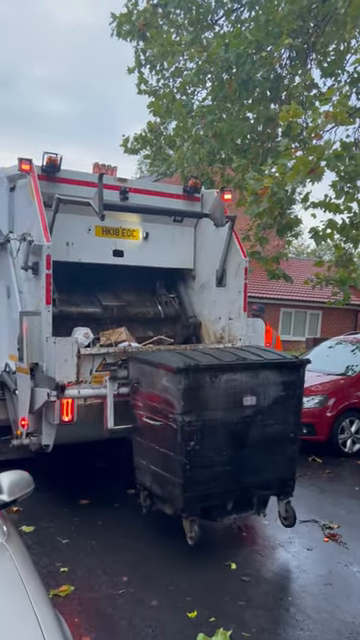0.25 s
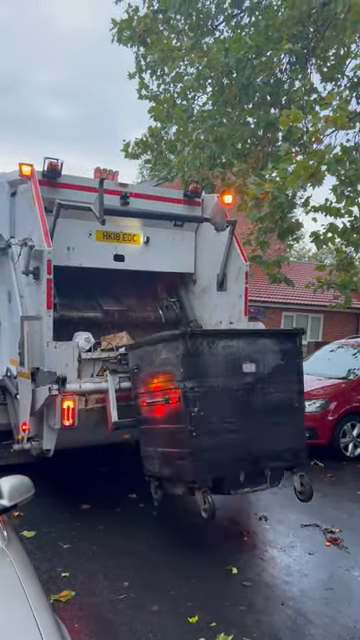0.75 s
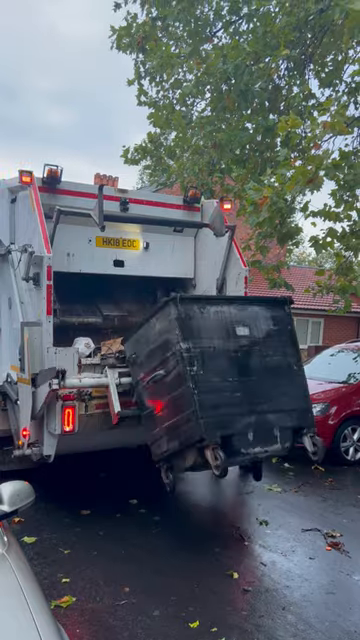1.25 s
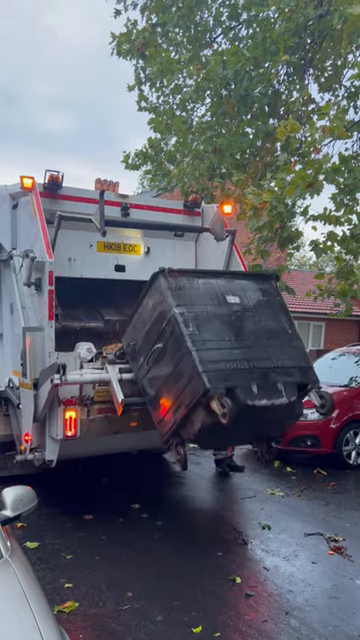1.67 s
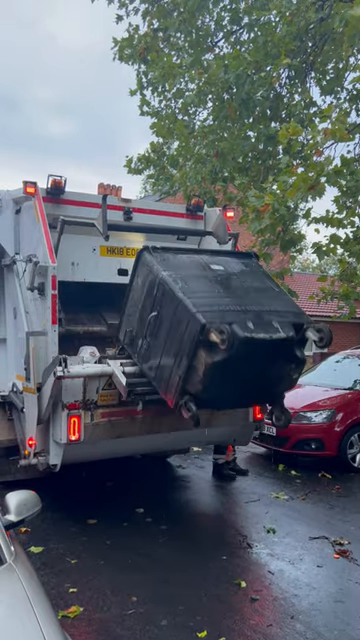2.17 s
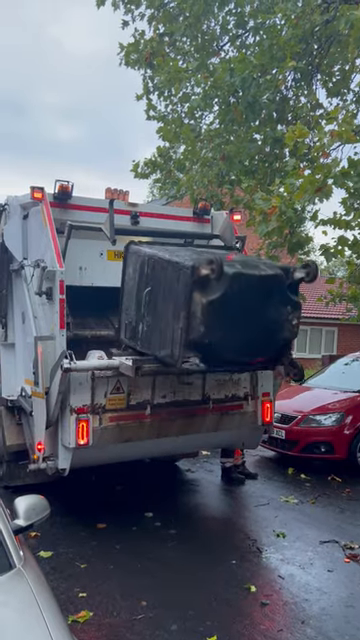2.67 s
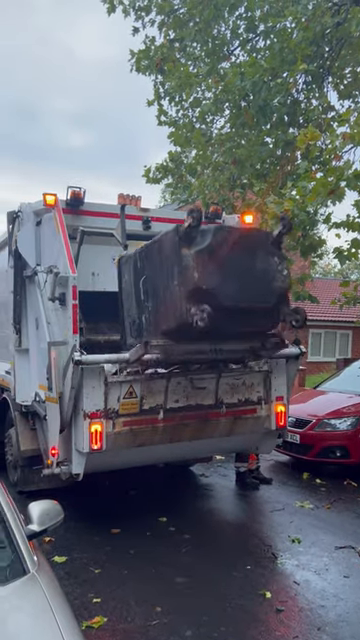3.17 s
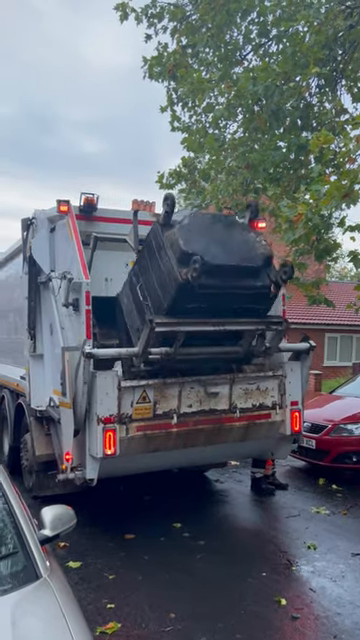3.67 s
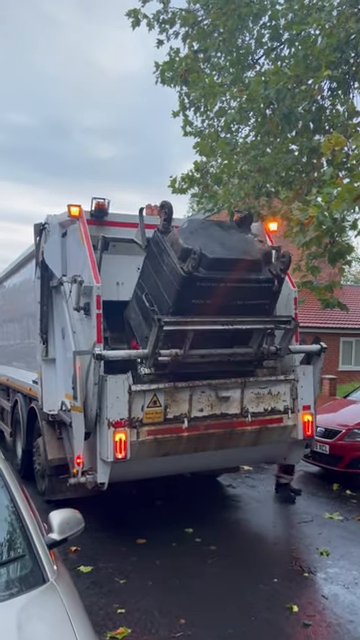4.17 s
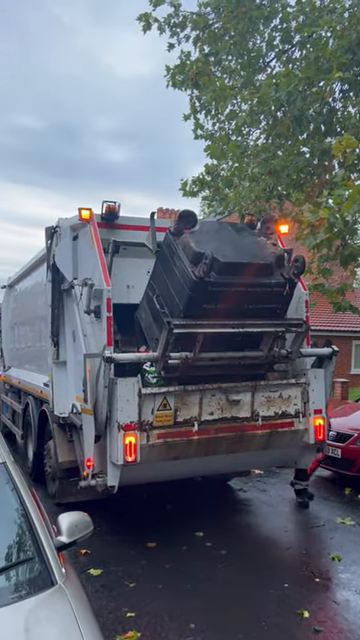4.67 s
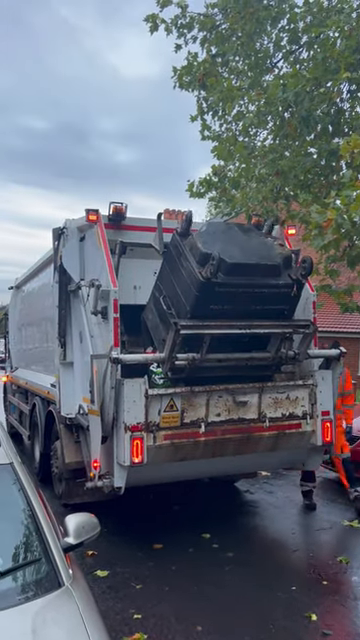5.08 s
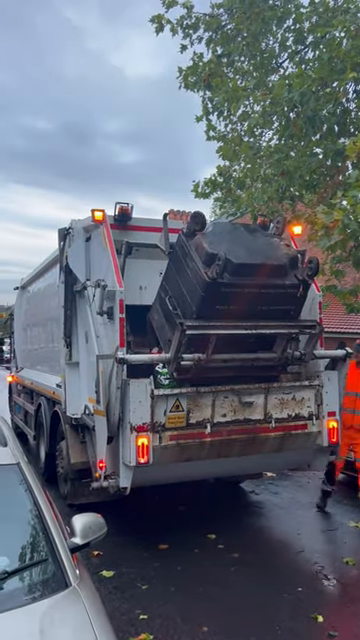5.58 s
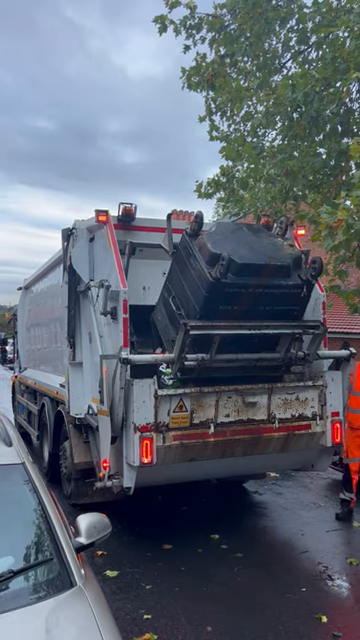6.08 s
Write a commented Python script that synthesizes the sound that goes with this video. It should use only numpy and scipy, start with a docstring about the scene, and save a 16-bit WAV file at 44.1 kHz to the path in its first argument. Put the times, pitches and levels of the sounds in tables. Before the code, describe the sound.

A refuse truck's engine drones and its hydraulics whine as a big wheeled bin clatters upward, scrapes, drops its rubbish and slams hard.

```python
"""A refuse truck runs throughout: tones tied to its crank drone, firings boom, gear whirrs, oil hisses, pump and lift whine.
The bin is knocked (panel noise and ringing modes), its fittings clink, its hollow body thumps, air spits.
It scrapes over the lift frame at 1.2 s; rubbish slides out in grains from 3.2 s; the frame slams its stop at 4.2 s.
The oil valve whistles shut at 4.7 s and open at 5.95 s, when the steelwork shudders.
House fronts answer all but the tones; two microphone ports hear it from slightly left."""
import sys
import numpy as np
from scipy import signal
from scipy.fft import rfft, irfft, next_fast_len
from scipy.io import wavfile
from scipy.ndimage import map_coordinates

SR = 44100
rng = np.random.default_rng(int(sys.argv[2]) if len(sys.argv) > 2 else 0)


def int16_out(signal):
    """Quantize to a 16-bit WAV file."""
    q = np.round(np.clip(np.atleast_2d(signal).T, -1, 1) * 32767)
    wavfile.write(sys.argv[1], SR, q.astype(np.int16))


N = 279149


def amp(db):
    """Decibels to gain."""
    return 10 ** (np.asarray(db) / 20)


def unit(x):
    """Scale to rms 1."""
    return x / np.sqrt(np.mean(x ** 2) + 1e-20)


def along(points, hz):
    """Read (freq_hz, value) points on a log frequency axis."""
    f, v = np.transpose(points)
    return np.interp(np.log(hz + 1), np.log(f + 1), v)


def curves(rows):
    """One value per sample for each column after time_s."""
    s, *cols = np.transpose(rows)
    return [np.interp(np.arange(N) / SR, s, c) for c in cols]


def wobble(rate_hz):
    """Smooth random curve, rate_hz knots a second."""
    coarse = np.arange(0, N + 64, 64)
    knots = rng.standard_normal(int(N * rate_hz / SR) + 4)
    smooth = map_coordinates(knots, [coarse * rate_hz / SR])
    return np.interp(np.arange(N), coarse, smooth)


def filtered(x, response):
    """Multiply the spectrum of x by response(hz)."""
    size = x.shape[-1]
    m = next_fast_len(size + 8192)
    return irfft(rfft(x, m) * response(np.fft.rfftfreq(m, 1 / SR)), m)[..., :size]


def coloured(x, spectrum):
    """Shape x with a spectrum, at rms 1."""
    return unit(filtered(x, lambda hz: amp(along(spectrum, hz))))


def noise(spectrum, size=N):
    """Gaussian noise of rms 1 with a spectrum."""
    return coloured(rng.standard_normal(size), spectrum)


def grains(rate_hz, spread_db):
    """Random tiny impacts of uneven size, at rms 1."""
    hits = rng.random(N) < rate_hz / SR
    sizes = rng.standard_normal(N) * amp(spread_db * rng.standard_normal(N))
    return unit(hits * sizes)


def fade(t60_s, attack_s):
    """Half a second of quick rise and exponential decay."""
    t = np.arange(SR // 2) / SR
    return (1 - np.exp(-t / attack_s)) * np.exp(-np.log(1000) * t / max(t60_s, .01))


def swell(start_s, end_s, attack_s, release_s):
    """Gain that rises from start_s, holds, and dies away after end_s."""
    t = np.arange(N) / SR
    rise = 1 - np.exp(-np.maximum(t - start_s, 0) / attack_s)
    return rise * np.exp(-np.maximum(t - end_s, 0) / release_s)


def add(track, s, sound):
    """Mix a sound in at time s."""
    part = track[int(s * SR):][:len(sound)]
    part += sound[:len(part)]


# hydraulic pump speed: time_s, pitch_hz
PUMP_SPEED = [(0, 427.8), (.65, 402.8), (1.2, 393.5), (2.5, 390.9), (3.6, 393.7), (4.5, 402.5),
              (4.85, 396.1), (6.12, 400.1), (6.33, 416)]


def shaft():
    """Crank turns; the pump tone is the sixteenth order of the crank."""
    pitch_hz = curves(PUMP_SPEED)[0] * (1 + .0025 * wobble(14))
    return np.cumsum(pitch_hz) / SR / 16


# truck effort, highest while it swings the full bin up: time_s, over_idle_db
EFFORT_CURVE = [(0, 12.5), (.8, 9.5), (.9, 14), (1.72, 12), (1.87, 6), (2.45, 0), (2.8, 2.5), (3.6, -3),
                (3.9, 6), (4.5, 2), (5.7, 0.5), (6.33, 9)]


def effort():
    """How hard the truck works, in dB over idle."""
    return curves(EFFORT_CURVE)[0]


def crank_tone(turns, multiple, flutter_db, blur_rad=0):
    """Sine locked to a multiple of crank speed, at rms 1, with fluttering level and blurred phase."""
    phase = 2 * np.pi * (multiple * turns + rng.random()) + blur_rad * wobble(40)
    return unit(np.sin(phase) * amp(flutter_db * wobble(7)))


ENGINE_IDLE_DB = -32.5
# engine orders and body resonances, as crank multiples: crank_multiple, relative_db
DRONE_TONES = [(2.1,-8),(3,-12.5),(4,-12.5),(5.5,-8.5),(6.2,-15.5),(8,-13.2),(9,-16),(11.5,-19.5)]


def drone(turns):
    """Engine orders and body resonances drone, following the effort."""
    mix = sum(amp(db) * crank_tone(turns, k, flutter_db=3.8) for k, db in DRONE_TONES)
    return amp(ENGINE_IDLE_DB + effort()) * mix


# hollow body's response to firings: freq_hz, relative_db
BOOM_SPECTRUM = [(22,-36),(36,-6.5),(54,-1.5),(90,-5.5),(115,-3),(140,-3),(180,-7.5),(230,-5.5),(330,-13.5),(500,-16.5),(800,-60)]


def boom(turns):
    """Three firings per crank turn and small random knocks shake the hollow body."""
    firings = np.diff(np.floor(turns * 3), prepend=0)
    shake = unit(firings * (1 + 0.12 * rng.standard_normal(N)))
    knocking = 0.19 * shake + grains(rate_hz=1500, spread_db=0.5)
    return amp(ENGINE_IDLE_DB + effort() - 2.5) * coloured(knocking, BOOM_SPECTRUM)


WHINE_ATTACK_S, WHINE_RELEASE_S = 0.073, 0.14
# pump strokes: start_s, end_s, level_db
PUMP_STROKES = [(-.2, 0.647, -36.5), (1.05, 2.675, -41.5), (2.84, 3.7, -48.5), (4.152, 4.86, -40.5),
                (6.214, 6.405, -31.5)]


def pump(turns):
    """The pump whines in strokes."""
    tone = crank_tone(turns, 16, flutter_db=2, blur_rad=.3)
    pumping = sum(amp(db) * swell(start, end, WHINE_ATTACK_S, WHINE_RELEASE_S)
                  for start, end, db in PUMP_STROKES)
    return pumping * tone


LIFT_START_DB, LIFT_FADE_DB_PER_S, LIFT_END_S = -46.5, 0.5, 4.63
# lift cylinder tones: crank_multiple, relative_db
LIFT_TONES = [(26.55,-0.5),(32,-2),(34.7,-7),(44,-4.5),(48.5,-7),(64,-11)]


def lift(turns):
    """The lift cylinders sing in several tones, fading slowly, then dying away after LIFT_END_S."""
    mix = sum(amp(db) * crank_tone(turns, k, flutter_db=2.5, blur_rad=.6) for k, db in LIFT_TONES)
    level_db = LIFT_START_DB - LIFT_FADE_DB_PER_S * np.arange(N) / SR
    return amp(level_db) * swell(0, LIFT_END_S, WHINE_ATTACK_S, release_s=0.46) * mix


RATTLE_IDLE_DB, RATTLE_DB_PER_EFFORT_DB, SCRAPE_RATTLE_DB = -37, 0.3, 3
OIL_IDLE_DB, OIL_DB_PER_EFFORT_DB, SCRAPE_HISS_DB = -45, 0.096, 4.5
VALVE_SHUT_S, VALVE_OPEN_S, BLEED_DB_PER_S = 4.7, 5.95, 5
# running gear: freq_hz, relative_db
RATTLE_SPECTRUM = [(180,-38),(300,-10),(520,-2.5),(780,-1),(1000,-6.5),(1250,-6),(1700,-12.5),(2200,-10),(3200,-19),(5000,-47)]
# oil hiss: freq_hz, relative_db
HISS_SPECTRUM = [(1800, -39), (3000, 1), (4200, 2), (6000, -4.5), (8000, -8.5), (11000, -16), (14000, -17),
                 (16000, -15)]


def machinery():
    """Gear whirrs and oil hisses, swelling with the scrape; rows: direct, scatter left, scatter right."""
    t = np.arange(N) / SR
    rattle = noise(RATTLE_SPECTRUM, (3, N))
    oil = noise(HISS_SPECTRUM, (3, N))
    scrape = scraping()
    # hiss bleeds away while the valve is shut
    reopened = swell(VALVE_OPEN_S, t[-1], attack_s=0.014, release_s=1)
    bleed_db = BLEED_DB_PER_S * np.maximum(t - VALVE_SHUT_S, 0) * (1 - reopened)
    rattle_db = RATTLE_IDLE_DB + RATTLE_DB_PER_EFFORT_DB * effort() + SCRAPE_RATTLE_DB * scrape
    rattle_db = rattle_db - 0.25 * bleed_db + 1.1 * wobble(18)
    oil_db = OIL_IDLE_DB + OIL_DB_PER_EFFORT_DB * effort() + SCRAPE_HISS_DB * scrape
    oil_db = oil_db - bleed_db + 0.67 * wobble(15)
    return amp(rattle_db) * rattle + amp(oil_db) * oil


# blows on the bin, levels before trims:
# start_s, level_db, brightness_db_per_octave, ring_t60_s, mode_hz, mode_vs_blow_db
BIN_BLOWS = [(.2, -17, -5.5, 0.12, 800, -8), (.395, -18, -3.5, 0.15, 1710, -16),
             (.568, -16.5, -3.5, 0.44, 752, -14), (.679, -21, -3, .06, 986, 0),
             (.871, -13, -3, 0.18, 639, -6), (1.277, -21, 0, .1, 835, -4), (1.357, -14.5, 0, 0.25, 880, -6),
             (1.437, -13, -1.5, 0.18, 1696, -12), (1.455, -13.5, -4, 0.1, 591, -4),
             (1.483, -16.5, -3.5, 0.094, 767, 0), (1.528, -15.5, -2, .15, 1197, -12),
             (1.954, -19, 0.5, 0.47, 702.7, -10.5), (3.134, -29, -11, 0.25, 319, -9),
             (3.662, -20.5, 1, 0.4, 464, -7.5), (3.79, -18, -3.5, 0.27, 1510, -13),
             (3.823, -12, -5, 0.22, 1407, -17), (3.854, -15.5, -6, 0.2, 393, -5),
             (3.914, -14.5, -2, 0.28, 747.5, -7), (4.016, -15, -5, 0.21, 324, -12),
             (4.18, -9.5, -1.5, 0.3, 333, -9.5), (4.222, -13.5, -3.5, 0.27, 381, -9),
             (4.312, -20.5, -0.5, 0.14, 603, -8), (4.523, -19.5, -1.5, 0.1, 1202, -9),
             (5.948, -17.5, -2.5, 0.16, 898, -9)]
# bin resonances: centre_hz, width_hz, relative_db
BIN_MODES = [(344, 100, -5), (877, 100, -3), (1213, 57, -8.5)]
# dense panel modes: freq_hz, relative_db
PANEL_SPECTRUM = [(80, -68), (250, -8.5), (380, -2), (520, 2.5), (700, -1), (950, -9), (1400, -11.5),
                  (2600, -11.5), (4500, -18.5), (14000, -41)]


def bin_response(f):
    """Sum of the bin's band-pass resonances."""
    return sum(amp(db) * 1j * f * w / (c * c - f * f + 1j * f * w) for c, w, db in BIN_MODES)


def blows():
    """Each contact clatters through dense panel modes and leaves the bin ringing, one mode most of all."""
    out, size = np.zeros(N), SR // 2
    t = np.arange(size) / SR
    for s, db, bright_db, t60, mode_hz, mode_db in BIN_BLOWS:
        slope = lambda hz: amp(bright_db * np.log2(np.clip(hz, 200, 8000) / 800))
        decay = fade(0.59 * t60, attack_s=0.0012) + 0.84 * fade(0.053, attack_s=0.00075)
        clatter = noise(PANEL_SPECTRUM, size) * decay
        ring = unit(filtered(rng.standard_normal(size), bin_response))
        ring = ring * fade(1.28 * t60, attack_s=0.0046)
        # loose contact makes the phase of the favoured mode drift
        drift = 0.084 * np.cumsum(rng.standard_normal(size))
        note = np.sin(2 * np.pi * mode_hz * t + drift) * fade(t60, attack_s=0.00057)
        rough = filtered(amp(db - 10) * clatter + amp(db - 13.0) * ring, slope)
        add(out, s, rough + amp(db + mode_db) * note)
    return out


CLINK_T60_S, CLINK_LOG_SPREAD = 0.088, .15
# loudest castors and catches: time_s, level_db before trim, centre_pitch_hz
FITTING_CLINKS = [(0.5574, -24, 3880), (.864, -23.5, 3860), (.933, -26, 3700), (1.209, -25, 4480),
                  (1.292, -23.5, 3960), (1.3482, -22, 4270), (1.431, -24.5, 4360), (1.507, -27, 4180),
                  (1.5295, -27, 4270), (1.946, -25, 3850), (2.732, -28, 4700), (3.321, -31, 4480),
                  (3.5819, -26.5, 3870)]
# castor tick: freq_hz, relative_db
CASTOR_SPECTRUM = [(1500, 6.5), (2800, -1), (3700, 1), (4500, -1), (5600, -12), (8000, -9), (15000, -29)]


def fittings():
    """Loose castors and catches tick and ring briefly, each in its own cluster of 30 pitches."""
    out, size = np.zeros(N), SR // 8
    t = np.arange(size) / SR
    for s, db, hz in FITTING_CLINKS:
        pitches = hz * np.exp(CLINK_LOG_SPREAD * rng.standard_normal(size=(30, 1)))
        ring = unit(np.sin(2 * np.pi * (pitches * t + rng.random(pitches.shape))).sum(axis=0))
        ring = ring * fade(CLINK_T60_S, attack_s=0.0013)[:size]
        tick = noise(CASTOR_SPECTRUM, size) * fade(t60_s=0.094, attack_s=0.001)[:size]
        add(out, s - .002, amp(db - 7.5) * (tick + ring))
    return out


THUMP_LOW_HZ, THUMP_HIGH_HZ = 60.2, 134.3
# dull thumps: start_s, level_db before trim, upper_mode_share_0_1
BODY_THUMPS = [(.628, -7.5, 0.04), (1.441, -9, 0.1), (1.97, -14, 0.95), (2.03, -20, 0), (2.218, -17, 0.01),
               (3.8, -8.5, 0.12), (3.869, -8, 0.13), (4.43, -11.5, 0.05), (5.349, -15.5, 0.68),
               (5.435, -14, 0.93), (6.02, -12, 0.5)]


def thumps():
    """A shifting load sets two low modes of the hollow body swinging."""
    out, t = np.zeros(N), np.arange(SR // 2) / SR
    low, high = np.sin(2 * np.pi * np.outer([THUMP_LOW_HZ, THUMP_HIGH_HZ], t))
    for s, db, upper in BODY_THUMPS:
        swing = low + np.clip(upper, 0, 1) * (high - low)
        add(out, s, amp(db - 1) * swing * fade(t60_s=0.24, attack_s=0.014))
    return out


# sharp spits of air and cracks: start_s, level_db, t60_s
AIR_SPITS = [(1.064, -23, 0.65), (4.111, -24, 0.28), (4.202, -15, 0.032), (4.208, -27.5, 0.15)]
# escaping air: freq_hz, relative_db
AIR_SPECTRUM = [(1200, -4), (3000, 4.5), (4500, -2.5), (8000, -0.5), (13000, -2), (16000, -1.5)]


def spits():
    """Bright noise bursts that die away; the shorter, the sharper their start."""
    out = np.zeros(N)
    for s, db, t60 in AIR_SPITS:
        add(out, s, amp(db) * noise(AIR_SPECTRUM, SR // 2) * fade(t60, attack_s=0.01 * t60))
    return out


SCRAPE_START_S, SCRAPE_END_S, SCRAPE_ATTACK_S, SCRAPE_RELEASE_S = 1.194, 1.46, 0.075, 0.2
SCRAPE_JUDDER_DEPTH, SCRAPE_JUDDER_HZ = 0.23, 55.26


def scraping():
    """Pressure of the tilting bin on the lift frame, juddering as it sticks and slips."""
    press = swell(SCRAPE_START_S, SCRAPE_END_S, SCRAPE_ATTACK_S, SCRAPE_RELEASE_S)
    return press * (1 + SCRAPE_JUDDER_DEPTH * wobble(SCRAPE_JUDDER_HZ))


GRIT_DB = -40
# rust and grit: freq_hz, relative_db
GRIT_SPECTRUM = [(1000, -18), (1700, 4), (2600, -16), (3700, -4), (4700, 1.5), (6000, -23)]


def grit():
    """Grit crunches under the sliding bin as random grains."""
    return amp(GRIT_DB) * scraping() * coloured(grains(rate_hz=600, spread_db=3.5), GRIT_SPECTRUM)


FALL_ATTACK_S, FALL_RELEASE_S = 0.012, 0.15
# loads sliding out: start_s, end_s, tumbling_db, rustling_db
RUBBISH_FALLS = [(3.173, 3.255, -59, -43), (3.56, 3.764, -37.5, -42), (3.787, 3.96, -26, -40),
                 (4.052, 4.29, -31, -41)]
# tumbling sacks: freq_hz, relative_db
TUMBLE_SPECTRUM = [(70,-29),(175,5.5),(400,5),(800,1),(1000,-1.5),(1550,-7.5),(1900,-16),(3000,-28),(6000,-30.5)]
# rustling plastic: freq_hz, relative_db
RUSTLE_SPECTRUM = [(1200, -3), (3000, 7.5), (4500, -1.5), (8000, -2), (13000, -7.5), (16000, -6.5)]


def rubbish():
    """Sacks tumble in lumps down the bin wall into the hopper, their plastic rustling."""
    tumbling, rustling = sum(np.outer(amp(levels_db), swell(start, end, FALL_ATTACK_S, FALL_RELEASE_S))
                             for start, end, *levels_db in RUBBISH_FALLS)
    lumps = amp(3.0 * wobble(45))
    tumble = tumbling * lumps * coloured(grains(rate_hz=1100, spread_db=1.5), TUMBLE_SPECTRUM)
    rustle = rustling * coloured(grains(rate_hz=7000, spread_db=-1.0), RUSTLE_SPECTRUM)
    return tumble + rustle


CRACK_DB = 1.5  # against the slam
# frame slams into its stop, bounces once: start_s, level_db before trims
FRAME_SLAMS = [(4.179, -5.8), (4.198, -10.8)]
# steel meeting steel: freq_hz, relative_db
CRACK_SPECTRUM = [(150, -22), (400, 4), (850, 4), (1700, -1.5), (4000, -17), (9000, -31)]


def cracks():
    """The hard, short noise burst at each slam."""
    out = np.zeros(N)
    for s, db in FRAME_SLAMS:
        burst = noise(CRACK_SPECTRUM, SR // 2) * fade(t60_s=0.04, attack_s=0.0036)
        add(out, s, amp(db + CRACK_DB) * burst)
    return out


CRASH_DB, CRASH_T60_S, CLANG_DB = -22, 0.57, -15.5  # levels against the slam
# frame modes: freq_hz, relative_db, t60_s
FRAME_MODES = [(306, 0.5, 0.41), (367, 1.5, .38), (528, 1.5, 0.18), (659, -1, 0.2), (917, -1, 0.47),
               (1256, -13, 0.38), (1800, -12, .18), (2515, 1, 0.17)]
# loose plates: freq_hz, relative_db
CRASH_SPECTRUM = [(200, -25), (380, 5), (800, -6), (1300, -1), (1900, -11), (5000, -33)]


def frame():
    """Frame modes clang, roughened by the bin rattling on it, over the crash of loose plates."""
    out, t = np.zeros(N), np.arange(SR // 2) / SR
    for s, db in FRAME_SLAMS:
        crash = noise(CRASH_SPECTRUM, len(t)) * fade(CRASH_T60_S, attack_s=.01)
        add(out, s, amp(db + CRASH_DB) * crash)
        for hz, mode_db, t60 in FRAME_MODES:
            drift = .0026 * np.sqrt(hz) * np.cumsum(rng.standard_normal(len(t)))
            clang = np.sin(2 * np.pi * hz * t + drift) * fade(t60, attack_s=.001)
            add(out, s, amp(db + CLANG_DB + mode_db) * clang)
    return out


WHISTLE_HZ, WHISTLE_DB, WHISTLE_S = 4840, -43.5, .1


def whistle():
    """Oil squeezes through the valve as it shuts and opens: a thin, unsteady note."""
    drift = 0.132 * np.cumsum(rng.standard_normal(N))
    phase = 2 * np.pi * WHISTLE_HZ * np.arange(N) / SR + drift
    moving = sum(swell(s, s + WHISTLE_S, attack_s=0.0097, release_s=0.065)
                 for s in (VALVE_SHUT_S, VALVE_OPEN_S))
    return amp(WHISTLE_DB) * np.sin(phase) * moving


SHUDDER_DB, SHUDDER_END_S = -25.8, 5.995
# shuddering steelwork: freq_hz, relative_db
SHUDDER_SPECTRUM = [(250, -10), (600, -4.5), (900, -1), (1500, -10.5), (2400, -26), (5000, -45)]


def shudder():
    """The steelwork shudders in a short, rough rush as the oil pressure returns."""
    rush = coloured(grains(rate_hz=1800, spread_db=0), SHUDDER_SPECTRUM)
    return amp(SHUDDER_DB) * swell(VALVE_OPEN_S, SHUDDER_END_S, attack_s=0.012, release_s=0.067) * rush


# house fronts: freq_hz, t60_s
STREET_DECAY = [(100,0.21),(1000,0.24),(4000,0.029),(14000,0.025)]


def street(x):
    """Diffuse echo of the house fronts, unrelated at the two ports and slowly varying."""
    out, step = np.zeros((2, N)), SR // 4
    # tails redrawn every quarter second and crossfaded, to avoid fixed ripple
    for start in range(0, N + step, step):
        hz, t, z = signal.stft(rng.standard_normal((2, SR // 3)), SR, nperseg=256)
        t60 = along(STREET_DECAY, hz)[:, None]
        decay = np.exp(-np.log(1000) * t / t60) / np.sqrt(t60)
        tail = signal.istft(z * decay, SR, nperseg=256)[1]
        span = np.arange(max(start - step, 0), min(start + step, N))
        piece = x[span] * np.cos(np.pi / 2 * (span - start) / step)
        for side, answer in zip(out, tail):
            add(side, span[0] / SR, signal.fftconvolve(piece, answer / np.linalg.norm(answer)))
    return out


# left port's phase lead: freq_hz, lead_rad
PORT_LEAD = [(0,0),(1500,0),(2200,2.4),(3300,2.6),(3800,.6),(5300,3.14),(7500,6.28),(10200,9.42),(15100,15.7)]


def ports(x):
    """Direct sound reaches the left port first: a phase lead that depends on frequency."""
    lead = lambda hz: np.interp(hz, *np.transpose(PORT_LEAD))
    return filtered(x, lambda hz: np.exp(.5j * np.outer([1, -1], lead(hz))))


# power share straight from the truck: freq_hz, share_0_1
DIRECT_SHARE = [(100,1),(200,0.97),(350,0.82),(520,0.37),(750,0.21),(1400,0.29),(2500,1),(3700,0.26),(4700,0),(5600,0.93),(14000,1)]


def scene():
    """Truck, bin and load, heard directly and scattered by the houses."""
    turns = shaft()
    knocks = boom(turns) + blows() + thumps() + spits() + grit() + rubbish() + frame() + shudder()
    sharp = fittings() + cracks()
    tones = drone(turns) + pump(turns) + lift(turns) + whistle()
    straight, *scatter = machinery()
    share = lambda hz: np.clip(along(DIRECT_SHARE, hz), 0, .9999)
    direct = filtered(knocks + straight, lambda hz: np.sqrt(share(hz))) + sharp + tones
    # long waves reach both ports alike
    unlike = lambda hz: np.sqrt(1 - share(hz)) * hz ** 2 / (hz ** 2 + 100 ** 2)
    return ports(direct) + filtered(street(knocks + sharp / 2) + scatter, unlike)


CEILING_DB, TOP_HZ = -1.5, 15700
# level difference of the ports: freq_hz, left_minus_right_db
PORT_TILT = [(120,0),(250,1.2),(500,1.8),(1200,2.8),(2400,.8),(5000,0)]


def record(dry):
    """Left port favours the midrange; the highest peaks are rounded off; nothing passes above TOP_HZ."""
    heard = filtered(dry, lambda hz: amp(np.outer([.5, -.5], along(PORT_TILT, hz))))
    rounded = heard / (1 + (heard / amp(CEILING_DB)) ** 4) ** (1 / 4)
    return filtered(rounded, lambda hz: hz < TOP_HZ)


dry = scene()
out = record(dry)
int16_out(out)
```